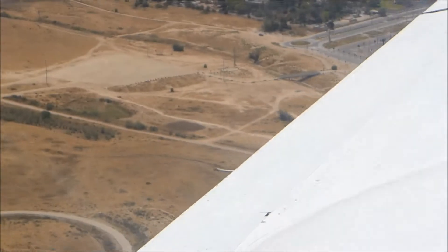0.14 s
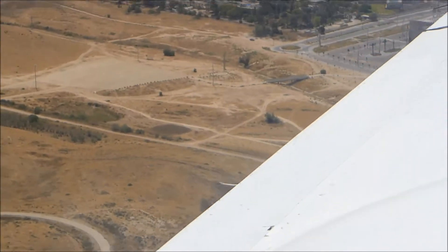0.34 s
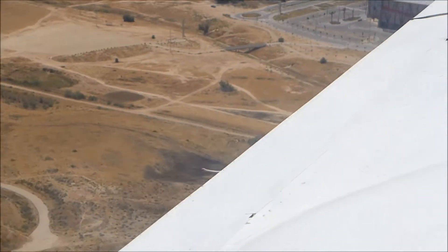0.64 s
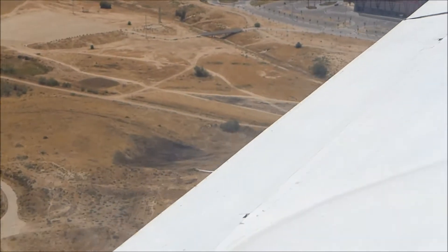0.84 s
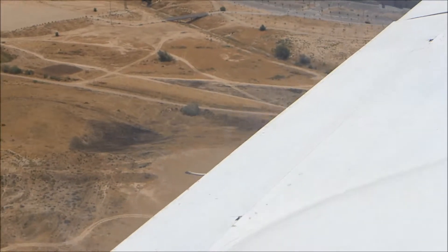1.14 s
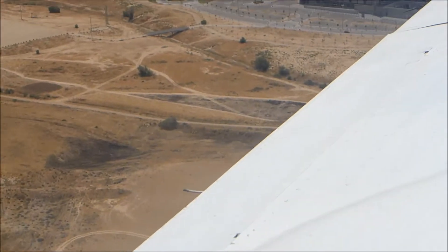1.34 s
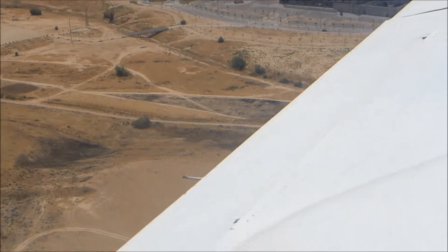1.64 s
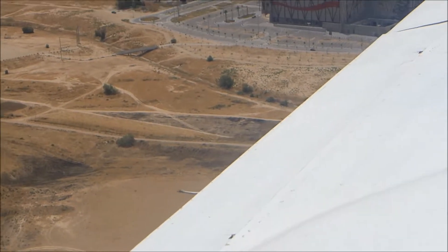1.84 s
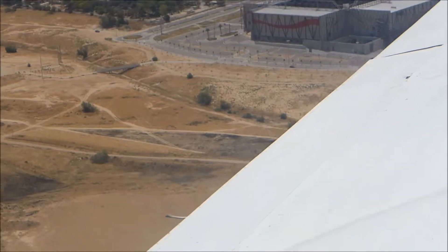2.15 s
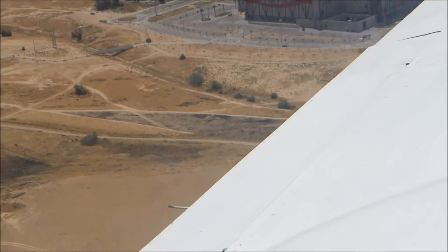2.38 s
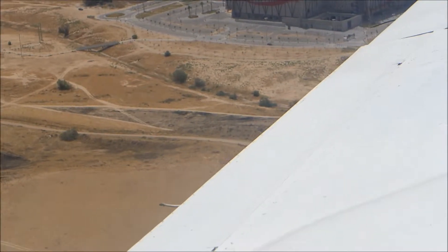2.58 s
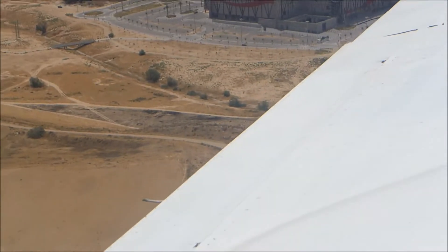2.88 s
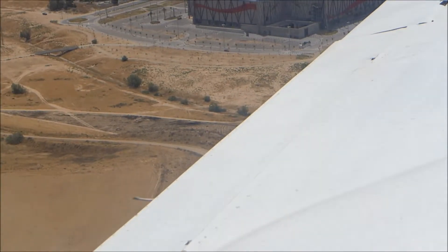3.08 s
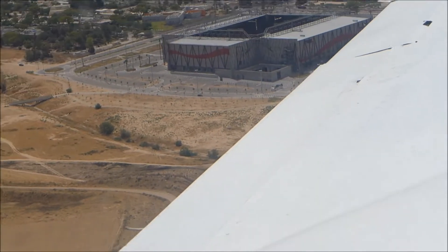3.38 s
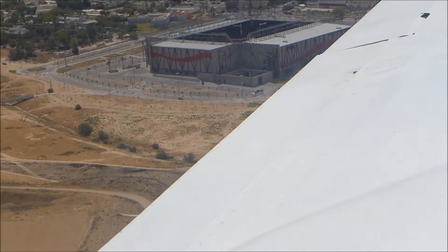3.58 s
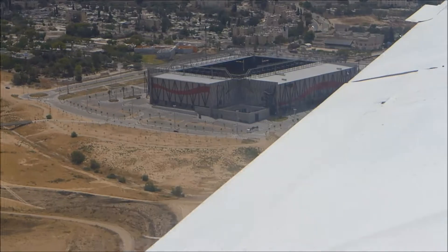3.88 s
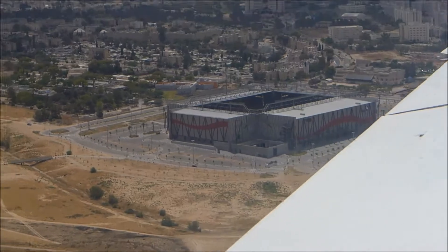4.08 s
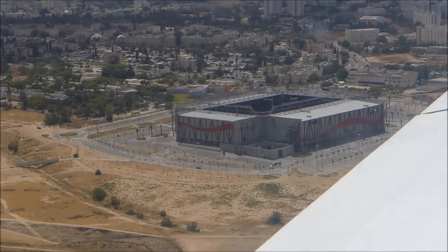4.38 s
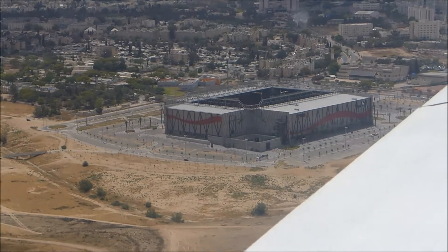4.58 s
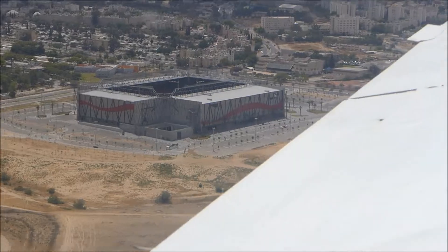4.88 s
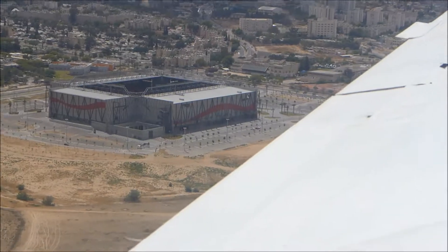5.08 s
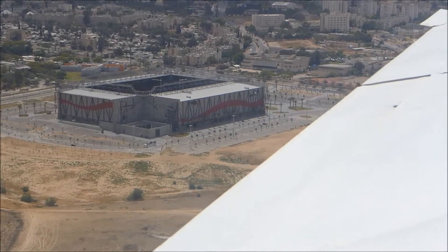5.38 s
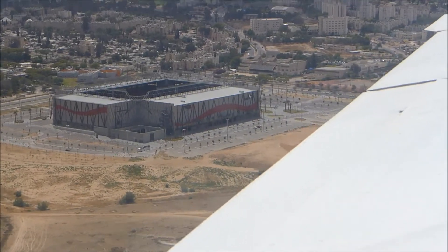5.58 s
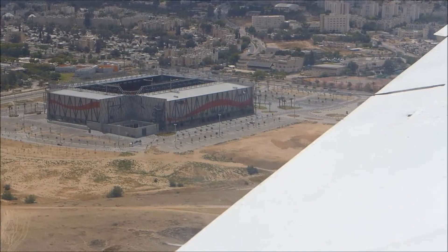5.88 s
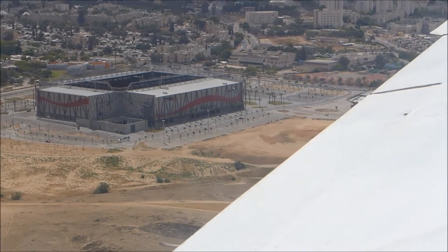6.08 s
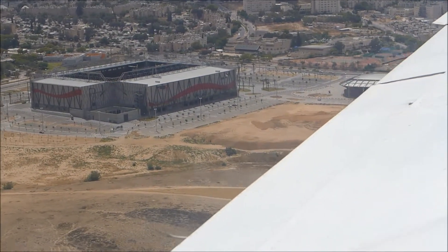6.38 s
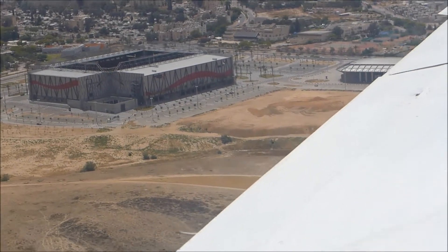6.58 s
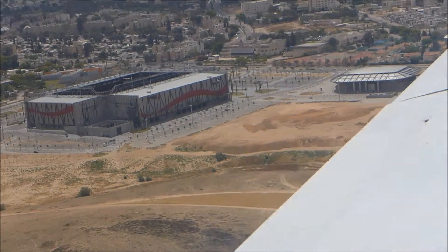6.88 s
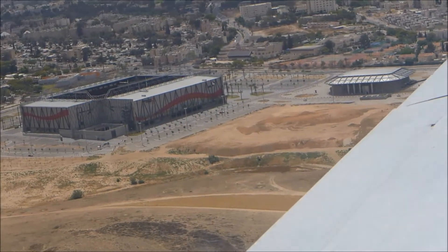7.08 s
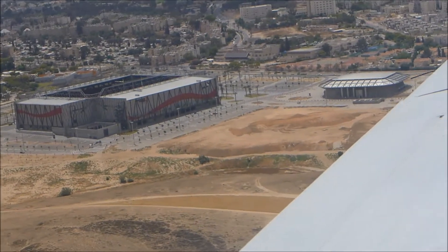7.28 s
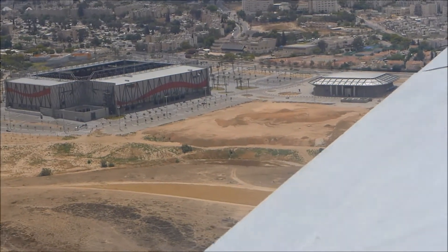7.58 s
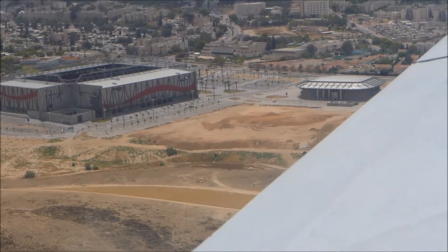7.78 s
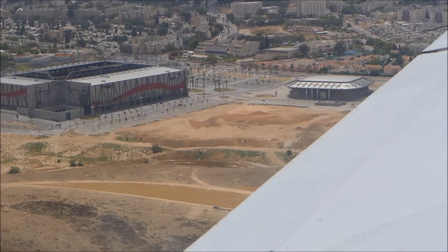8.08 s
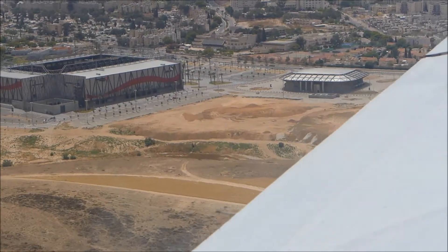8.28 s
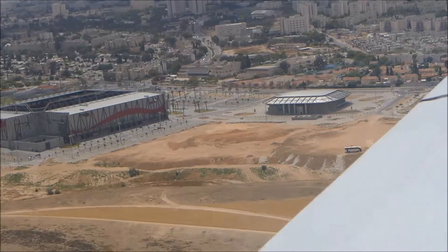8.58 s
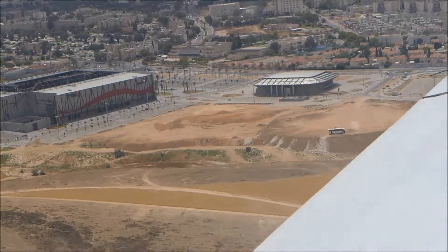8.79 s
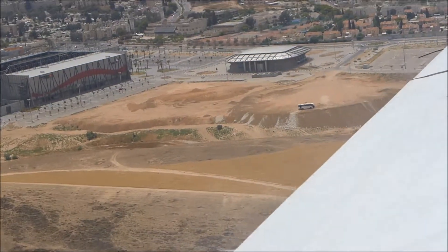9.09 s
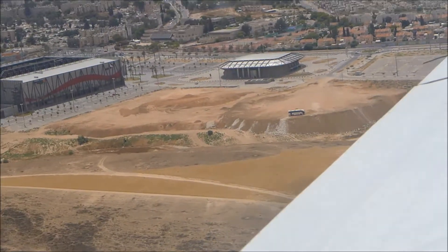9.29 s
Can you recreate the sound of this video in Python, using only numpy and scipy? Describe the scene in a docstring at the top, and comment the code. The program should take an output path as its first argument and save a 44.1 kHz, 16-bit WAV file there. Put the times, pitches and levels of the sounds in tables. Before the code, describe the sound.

Two piston engines, slightly out of step, make a deep, beating drone in a small aircraft's cabin, wrapped in broad air noise. A loose part rattles faintly and an instrument hums. After about four seconds the sound stops abruptly, then resumes a moment later, a little fuller in the low tones, and carries on steadily to the end. The stereo microphone is hand-held inside the cabin.

```python
"""A deep, beating drone in a rush of air: a light twin-engine aircraft in cruise, heard in the cabin.
Two four-cylinder engines, slightly out of step, sound at multiples of their cycles and interfere.
Turbulent air over the skin rings the cabin, a gyro rotor hums and a loose part ticks.
The sound drops out once; then the hand-held stereo microphone points elsewhere (stretch 0, then 1).
The recorder's gain control ducks the rush whenever the beating booms swell."""
import sys
import numpy as np
from scipy import signal
from scipy.fft import rfft, irfft, next_fast_len
from scipy.io import wavfile

SR = 44100
rng = np.random.default_rng(int(sys.argv[2]) if len(sys.argv) > 2 else 0)


def store_pcm(level_fs):
    """Save levels as 16-bit WAV."""
    pcm = np.round(np.clip(level_fs, -1, 1) * 32767).astype(np.int16)
    wavfile.write(sys.argv[1], SR, np.atleast_2d(pcm).T)


N = 416744


def undb(db):
    """Amplitude ratio of a level: a factor of ten for every 20 dB."""
    return np.exp(np.asarray(db) * (np.log(10) / 20))


def on_log(table, hz):
    """Interpolation of (frequency [Hz], value) rows on a logarithmic frequency axis."""
    frequencies, values = np.transpose(table)
    return np.interp(np.log(hz), np.log(frequencies), values)


def wander(t, rate_hz):
    """Slow random fluctuation: Gaussian values joined by straight lines, spread near 1."""
    knots = np.arange(t[0], t[-1] + 2 / rate_hz, 1 / rate_hz)
    return 1.14 * np.interp(t, knots, rng.standard_normal(len(knots)))


def noise_spectrum(shape_db, rms_db):
    """Spectral shaping: the spectrum of white noise, weighted and scaled to an rms level."""
    spectrum = rfft(rng.standard_normal(2 * len(shape_db) - 2)) * undb(shape_db)
    return spectrum * undb(rms_db) / np.std(irfft(spectrum))


def partial(t, cycles, rms_db, waver_db, drift_rad):
    """Amplitude and phase modulation of a sinusoid by a changing air path."""
    phase = 2 * np.pi * (cycles + rng.random()) + drift_rad * wander(t, 5)
    level_db = rms_db + waver_db * wander(t[::128], 6.18)
    return np.interp(t, t[::128], np.sqrt(2) * undb(level_db)) * np.sin(phase)


# Loose part: (rms level in stretch 0 [dB], in stretch 1 [dB])
TICK_LEVELS = [-47, -62]

def loose_part(stretch, cycles, band_hz, decay_s):
    """Impact excitation: once a shaft turn, a noise burst of uneven size decays exponentially."""
    shaft_turns = 2 * (cycles - cycles[0])
    turn = shaft_turns.astype(int)
    strength = undb(4. * rng.standard_normal(turn[-1] + 1))[turn]
    age_s = (shaft_turns - turn) / (np.gradient(shaft_turns) * SR)
    band = signal.butter(2, band_hz, "bandpass", fs=SR, output="sos")
    bursts = signal.sosfilt(band, strength * np.exp(-age_s / decay_s) * rng.standard_normal(len(cycles)))
    return undb(TICK_LEVELS[stretch]) * bursts / np.std(bursts)


# Rotor speed: (frequency in stretch 0 [Hz], in stretch 1 [Hz])
ROTOR_HZ = [139.9, 141.8]
# Hum and whines: (multiple of rotor speed, rms level in stretch 0 [dB], in stretch 1 [dB])
ROTOR_PARTIALS = [(1, -46.5, -43), (3, -37, -41.5), (6, -54, -48), (7.24, -58, -53), (8.8, -58, -54),
                  (12, -56, -53), (19.83, -60, -54)]

def gyro(stretch, t):
    """Steady rotation radiates harmonics of the rotor speed; faint inharmonic whines lie near them."""
    cycles = ROTOR_HZ[stretch] * t
    return sum(partial(t, multiple * cycles, levels[stretch], waver_db=1.5, drift_rad=.025 * multiple**2)
               for multiple, *levels in ROTOR_PARTIALS)


# Rush common to both microphone ports, per stretch: (frequency [Hz], relative density [dB])
COMMON_SHAPE = [
    [(21, -36), (45, -34.5), (97, -22), (130, -14), (203, -11), (305, -10), (471, -13.5), (784, -15.5),
     (1730, -18), (2350, -17.5), (3530, -19.5), (5000, -22.5), (10800, -32), (13000, -38), (15500, -40)],
    [(21, -26), (45, -30), (97, -15), (130, -6.5), (198, -8.5), (313, -8.5), (384, -14), (535, -12.5),
     (1150, -21), (2290, -20), (3530, -22), (5040, -25.5), (11100, -36), (13300, -41), (15500, -52)],
]
# Diffuse rush, unlike at the two ports, per stretch: (frequency [Hz], relative density [dB])
DIFFUSE_SHAPE = [
    [(18, -42), (30, -13.5), (69, -9.5), (114, -14.5), (291, -3), (359, -7), (638, -8), (766, -3),
     (1630, -1), (2300, -1), (4080, -2), (4530, -4), (6040, -4), (10400, -10), (12000, -14), (13000, -27),
     (15500, -42)],
    [(18, -39), (30, -10.5), (66, -9.5), (108, -14), (219, -6), (443, -8), (1130, -4), (1260, -1),
     (1510, -3), (1860, -2), (3490, -6), (4770, -5), (6880, -11), (12500, -14.5), (14500, -23),
     (15500, -40)],
]
# Common and diffuse rush: (rms level in stretch 0 [dB], in stretch 1 [dB])
COMMON_DB = [-20, -22]
DIFFUSE_DB = [-32.5, -33]
# Cabin resonances and hollows, per stretch: (frequency [Hz], width [Hz], gain [dB])
CABIN_MODES = [
    [(780, 110, 4.5), (1100, 80, -3), (1410, 80, -3.5), (1770, 80, -3), (1930, 120, 2.5), (2310, 110, 5),
     (2510, 210, 4), (2604, 69, -7.5), (3660, 100, -5.5), (3770, 160, 6.5), (4093, 260, 5.5),
     (4400, 200, -2), (4800, 480, 2.5), (5630, 340, 3), (8260, 900, 2), (11900, 1200, 1)],
    [(1145, 84, 1), (1020, 64, 3), (1305, 77, 4.5), (1440, 170, -1.5), (1760, 430, 3), (2130, 74, -1.5),
     (2256, 72, 5.5), (2660, 56, 0), (2440, 90, 1.5), (2800, 89, 1), (3280, 43, 6.5), (3430, 420, -3),
     (4090, 250, 2.5), (4380, 280, -4), (5100, 830, 1.5)],
]

def cabin_spectra(stretch, hz):
    """Source and filter: turbulence noise coloured by cabin resonances, and a diffuse field beside it."""
    modes_db = sum(db * np.exp(-.5 * (2 * (hz - centre) / width) ** 2)
                   for centre, width, db in CABIN_MODES[stretch])
    common = noise_spectrum(on_log(COMMON_SHAPE[stretch], hz) + modes_db, COMMON_DB[stretch])
    diffuse = noise_spectrum(on_log(DIFFUSE_SHAPE[stretch], hz), DIFFUSE_DB[stretch])
    return common, diffuse


# Balance of the common rush, per stretch: (frequency [Hz], left minus right [dB])
BALANCE = [
    [(450, 0), (700, -.5), (1290, 1.5), (2380, 1), (4400, 1), (8120, 1.5), (15000, 0)],
    [(700, 0), (1290, -3), (2380, -4), (4400, -4), (8120, -1.5), (15000, 0)],
]
# Engine vibration shaking the treble: (multiple of the cycle, depth from 11 kHz up [dB])
TREBLE_THROB = [(2, 0.83), (4, 1.24), (8, 0.9)]
# Centres of the swelling ranges: (low [Hz], middle [Hz], treble [Hz])
RANGE_HZ = [330, 1500, 6000]
# Swell of the rush, per stretch: (time [s], low gain [dB], middle gain [dB], treble gain [dB])
RANGE_SWELL = [
    [(0, 2, .6, .6), (.45, 0, .6, 0.5), (1.1, -2, -.6, -0.8), (1.9, .3, .3, 0.5), (2.4, -2, -.6, -.6),
     (2.85, 1, 1.2, 0.9), (3.3, -1.3, -0.14, 0.2), (3.7, -0.5, 0.84, 0.4), (4.1, -4, -1.4, -0.7)],
    [(4.85, 1.2, 2.2, 1.3), (5.15, -1.5, 1.5, 0.49), (5.5, -0.2, -1.2, -.8), (6.05, -0.5, -0.9, 0.056),
     (6.6, -2.5, -1, -0.48), (7.2, -2.5, 0.5, 0.11), (7.8, 0, 1.2, 1.4), (8.2, -1.5, 0, -0.55),
     (8.6, -3, -1.1, -1.5), (8.9, -0.5, 0.5, 0.25), (9.2, -4, -.3, -0.13), (9.45, 3, 0.5, 1)],
]
# Colour of the common rush as the microphone briefly turns: (frequency [Hz], gain [dB])
TURN_COLOUR = [(1600, -0.5), (2450, -4.5), (3200, -0.8), (4100, -2.5), (5050, 5), (6400, -3.5),
               (10000, -1.5)]
TURN_S, TURN_WIDTH_S = .76, .15

def air_rush(stretch, t, cycles):
    """Amplitude modulation of turbulence noise: third-octave bands sway, flicker and throb."""
    size = 2 * next_fast_len(len(t) // 2 + 1)
    hz = np.maximum(np.arange(size // 2 + 1) * SR / size, 1)
    common, diffuse = cabin_spectra(stretch, hz)
    swell_s, *swell_db = np.transpose(RANGE_SWELL[stretch])
    coarse_t, octave = t[::128], np.log2(hz)
    turning = np.exp(-.5 * ((coarse_t - TURN_S) / TURN_WIDTH_S) ** 2)
    throb_db = sum(depth * np.cos(2 * np.pi * multiple * cycles) for multiple, depth in TREBLE_THROB)
    treble_db = throb_db + .7 * wander(t, 70)
    gust_db = .3 * wander(coarse_t, 9)
    out, ports = np.zeros((2, len(t))), np.array([[1], [-1]])
    for centre in 25 * 2 ** (np.arange(29) / 3):
        # overlapping cosine windows keep the summed bands flat
        window = np.cos(np.pi / 2 * np.clip(3 * (octave - np.log2(centre)), -1, 1)) ** 2
        sway_db = (.15 + 1.9 * min(90 / centre, 1)) * wander(coarse_t, 3)
        band_swell = [on_log(np.c_[RANGE_HZ, row], centre) for row in np.transpose(swell_db)]
        flicker_db = .5 * wander(coarse_t, 12)
        band_db = sway_db + np.interp(coarse_t, swell_s, band_swell) + gust_db + flicker_db
        gain = undb(min(centre / 11000, 1) * treble_db + np.interp(t, coarse_t, band_db))
        balance = undb(on_log(BALANCE[stretch], centre) / 2 * ports)
        turn_gain = np.interp(t, coarse_t, undb(turning * on_log(TURN_COLOUR, centre)))
        mid = turn_gain * irfft(common * window)[:len(t)]
        side = irfft(diffuse * window)[:len(t)]
        out += gain * (balance * mid + ports * side)
    return out


# Drone of each engine: (multiple of its cycle, rms level in stretch 0 [dB], in stretch 1 [dB])
FAST_PARTIALS = [(6.015, -39.5, -44), (6.95, -54, -36), (9, -38.5, -39), (9.97, -38.5, -52),
                 (11.04, -47.5, -39.5), (13.04, -43, -50), (14.06, -58, -49), (15.05, -38, -42),
                 (15.96, -38, -35), (17.09, -40.5, -37.5), (18, -47.5, -41.5), (18.9, -52, -48),
                 (19.95, -47, -50), (20.6, -50, -54), (24.3, -54.5, -46), (26.93, -46, -43.5),
                 (27.85, -46.5, -39.5), (29.95, -56.5, -51)]
SLOW_PARTIALS = [(10.09, -50, -38.5), (12.9, -49, -41), (15.12, -42, -48), (15.96, -43.5, -39),
                 (18.98, -43.5, -43.5), (23.9, -56.5, -39)]

def engine_drone(stretch, t, fast_cycles, slow_cycles):
    """Periodic excitation: engines and propellers radiate partials, most near multiples of the cycle."""
    return sum(partial(t, multiple * cycles, levels[stretch], waver_db=2., drift_rad=.025 * multiple)
               for table, cycles in ((FAST_PARTIALS, fast_cycles), (SLOW_PARTIALS, slow_cycles))
               for multiple, *levels in table)


# The faster engine pulls ahead, and each comes nearer or farther as the hand moves, per stretch:
# (time [s], lead [cycles], faster boom gain [dB], slower boom gain [dB])
ENGINE_DRIFT = [
    [(0, 0.063, -10, 0.5), (.82, .109, 6.5, -3), (1.64, 0.17, -3, 1.5), (2.46, 0.26, 1, 0.5),
     (3.28, 0.36, 0, 1), (4.1, 0.48, -2, 1.3)],
    [(4.85, 0.037, 2, -3), (5.425, .146, -1.5, -0.2), (6.0, 0.19, -2, 0.7), (6.575, .26, -0.5, 1.2),
     (7.15, 0.279, -2.2, 0.6), (7.725, .28, 1, -1.8), (8.3, 0.33, -4.5, -1), (8.875, 0.45, 0.5, -0.2),
     (9.45, 0.52, -1.1, -3)],
]
# Booms, per stretch: (multiple of the cycle, faster level [dB], slower level [dB], path lead [cycles])
BOOM_HARMONICS = [
    [(4, -45.5, -51, .045), (8, -35.5, -24.5, 0.0043), (12, -53.5, -40.5, 0.045)],
    [(4, -39, -54, 0.081), (8, -28.5, -23, 0), (12, -31.5, -31.5, 0.044)],
]

def engine_booms(stretch, t, slow_cycles):
    """Interference: harmonics of both engines swell when in phase and sag when opposed, making beats."""
    times, *columns = np.transpose(ENGINE_DRIFT[stretch])
    lead, fast_gain_db, slow_gain_db = (np.interp(t, times, column) for column in columns)
    out = np.zeros(len(t))
    for multiple, fast_db, slow_db, path_lead in BOOM_HARMONICS[stretch]:
        phase = 2 * np.pi * (multiple * slow_cycles + rng.random()) + .11 * wander(t, 4.6)
        out += undb(fast_db + fast_gain_db) * np.sin(phase + 2 * np.pi * multiple * (lead + path_lead))
        out += undb(slow_db + slow_gain_db) * np.sin(phase)
    return np.sqrt(2) * out


# Stretches of sound around the dropout: (start [s], end [s])
STRETCH_TIMES = [(0, 4.0972), (4.8557, 9.45)]
# Cycle of the slower engine, two shaft turns long: (time [s], frequency [Hz])
CYCLE_RATE = [(0, 19.06), (.9, 19.14), (2.4, 19.05), (3.5, 19.12), (4.9, 19.08), (5.9, 19.07), (6.5, 19.13),
              (7.3, 19.1), (8, 19.19), (9.45, 19.21)]

def scene():
    """Superposition: all sources add, in two stretches of flight with silence between."""
    out, clock = np.zeros((2, N)), np.arange(N) / SR
    cycles = np.cumsum(np.interp(clock, *np.transpose(CYCLE_RATE))) / SR
    for stretch, (start, end) in enumerate(STRETCH_TIMES):
        span = slice(int(start * SR), min(int(end * SR), N))
        t, slow_cycles = clock[span], cycles[span]
        lead_s, lead = np.transpose(ENGINE_DRIFT[stretch])[:2]
        fast_cycles = slow_cycles + np.interp(t, lead_s, lead)
        out[:, span] += engine_drone(stretch, t, fast_cycles, slow_cycles)
        out[:, span] += engine_booms(stretch, t, slow_cycles)
        out[:, span] += gyro(stretch, t)
        out[:, span] += air_rush(stretch, t, fast_cycles)
        out[:, span] += loose_part(stretch, fast_cycles, band_hz=(5500, 13000), decay_s=.0015)
    return out


TARGET_DB, RATIO, REACTION_S, CUTOFF_HZ = -18, 3., .12, 15520

def record(dry):
    """Dynamic compression: the gain falls as the smoothed power rises; a low-pass cuts the top."""
    sounding = dry[0] != 0
    power = np.mean(dry[:, sounding] ** 2, axis=0)
    pole, target_power = np.exp(-1 / (REACTION_S * SR)), undb(2 * TARGET_DB)
    smoothed = signal.lfilter([1 - pole], [1, -pole], power, zi=[pole * target_power])[0]
    gain = np.zeros(N)
    gain[sounding] = (target_power / smoothed) ** ((1 - 1 / RATIO) / 2)
    return signal.sosfilt(signal.ellip(12, .2, 70, CUTOFF_HZ, fs=SR, output="sos"), dry * gain)


dry = scene()
out = record(dry)
store_pcm(out)
```